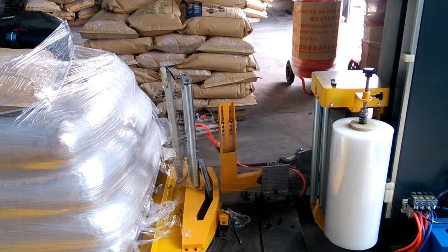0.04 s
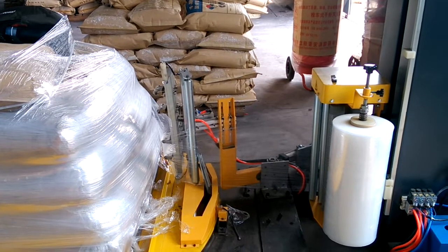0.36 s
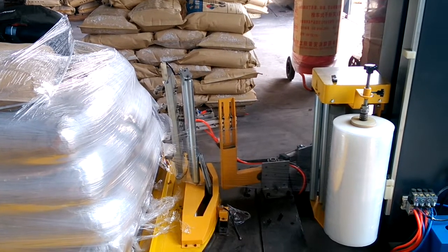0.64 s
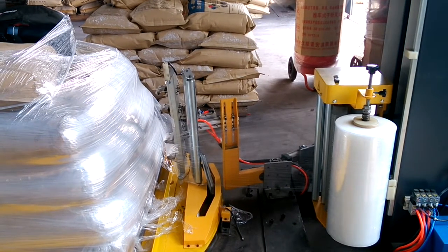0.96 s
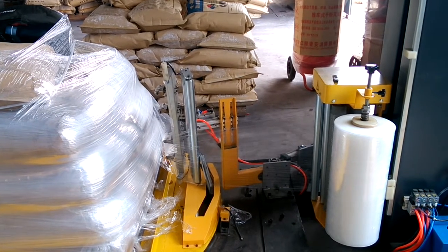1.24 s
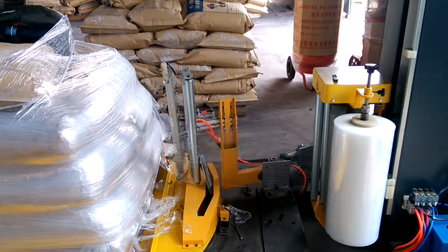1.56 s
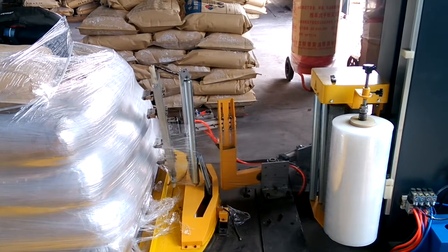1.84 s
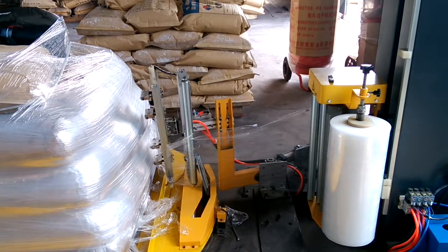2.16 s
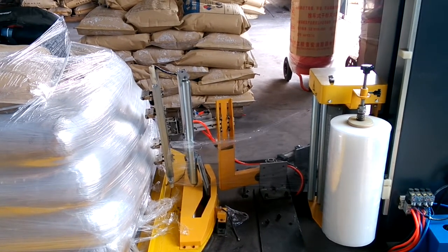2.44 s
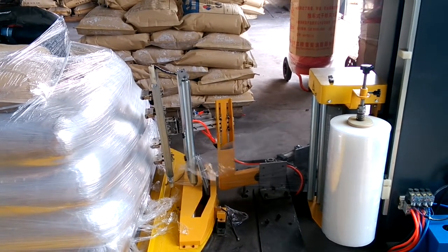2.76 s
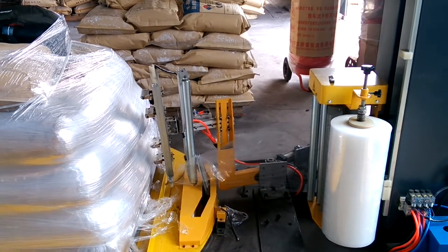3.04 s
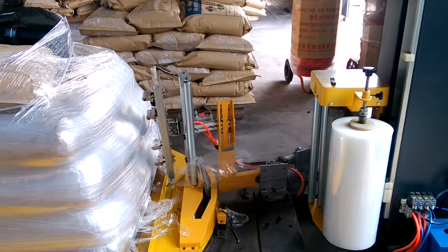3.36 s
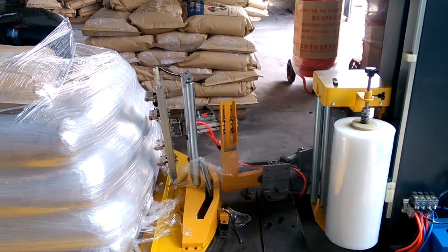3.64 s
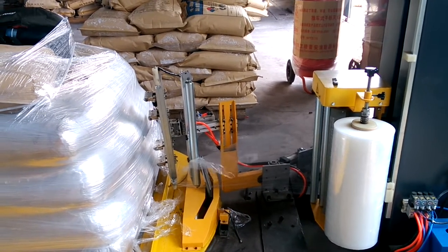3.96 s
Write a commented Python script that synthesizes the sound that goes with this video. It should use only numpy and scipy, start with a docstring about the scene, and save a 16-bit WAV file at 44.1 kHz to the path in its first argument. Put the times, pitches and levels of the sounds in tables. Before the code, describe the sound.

Compressed air puffs, a steel clamp clanks, then air hisses loudly over a low motor hum.

```python
"""A warehouse, where a pallet wrapper ends its cycle over throbbing motors and a faint air leak.
A valve snaps and vents a puff; the steel film clamp swings over, clanks against its stops and shakes
the deck. Then a second valve opens and compressed air hisses loudly and steadily from a nozzle.
The machine leaves a dull echo in the hall, and a noise suppressor ducks the quiet moments."""
import sys
import numpy as np
from scipy import signal
from scipy.fft import rfft, irfft
from scipy.io import wavfile
from scipy.ndimage import uniform_filter1d

SR = 44100
rng = np.random.default_rng(int(sys.argv[2]) if len(sys.argv) > 2 else 0)


def generate_wav(sig):
    """Save sig (samples, or channels by samples) to the path in sys.argv[1] as 16-bit PCM at SR."""
    pcm = np.round(np.clip(np.atleast_2d(sig).T, -1, 1) * 32767).astype(np.int16)
    wavfile.write(sys.argv[1], SR, pcm)


N = 176400
T = np.arange(N) / SR
HZ = np.maximum(np.arange(N // 2 + 1) * SR / N, 1)


# Level ride of the open jet: time_s, level_db
JET_RIDE = [(2.62, -13), (2.69, -11), (2.724, -12), (2.744, -11.5), (2.775, -13), (2.96, -12.5),
            (2.995, -14), (3.045, -13), (3.51, -14), (3.545, -12.5), (3.64, -14.5), (3.77, -14), (3.8, -15),
            (3.9, -13.5), (3.955, -15)]
# Bright hiss of the escaping air: freq_hz, gain_db
HISS_EQ = [(1060, -48), (1800, -19.5), (2160, -17), (2560, -12), (3040, -16), (3490, -13.5), (4170, -15.5),
           (4870, -10.5), (5310, -11), (6100, -6.5), (6690, -6.8), (7230, -2), (8220, -0.5), (9350, -4),
           (11100, -10.5), (14000, -14.5)]
# Low roar of air striking film and frame: freq_hz, gain_db
ROAR_EQ = [(70, -4.5), (130, -8), (190, -5.5), (230, 2), (290, -5), (370, 2.5), (480, -6), (640, -11.5),
           (830, -6.5), (1000, -4), (1350, -3), (1650, -11.5), (2000, -12.5)]
# Nozzle whistles: pitch_hz, width_hz, level_db
NOZZLE_RINGS = [(1412, 40, -15), (2630, 200, -17), (5027, 60, -16), (5600, 50, -15), (7346, 100, -5),
                (8139, 45, -1.5), (8330, 50, 0), (9212, 110, -1), (10440, 100, -12)]

def air_jet(leak_s=2.573, open_s=2.605):
    """The second valve leaks briefly, then opens to a fluttering jet of hiss, whistles and roar."""
    opening = np.clip((T - open_s) / .006, 0, 1)
    leak = from_db(-21.5) * (T > leak_s) * (1 - opening)
    flow = leak + opening * from_db(np.interp(T, *np.transpose(JET_RIDE)) - .5)
    roar = noise(colour(ROAR_EQ) / (1 + (HZ / 2500) ** 4))
    hiss = noise(colour(HISS_EQ))
    whistles = noise(resonances(NOZZLE_RINGS))
    air = hiss + from_db(-6) * whistles + from_db(-16) * roar
    flutter_db = .36 * drift(rate_hz=24.3)
    sputter_db = .3 * drift(rate_hz=250)
    return flow * from_db(flutter_db + sputter_db) * turbulence(hiss_swell(air))


# Level ride of the lower band of the hiss: time_s, gain_db
SWELL_RIDE = [(2.885, .4), (2.91, -1), (3.33, -0.8), (3.49, 2.5), (3.53, -1.5), (3.64, 2), (3.685, 0)]

def hiss_swell(air, centre_hz=5740, width_hz=970):
    """The lower part of the hiss swells and recedes."""
    band = irfft(rfft(air) / (1 + ((HZ - centre_hz) / width_hz) ** 4), N)
    gain = from_db(np.interp(T, *np.transpose(SWELL_RIDE)))
    return air + band * (gain - 1)


def turbulence(air, treble_depth_db=1.8, flutter_hz=24.3, swell_hz=6):
    """Each band of the jet flutters and swells on its own, the treble most."""
    centres_hz = np.array([500, 1500, 3500, 6000, 7500, 8500, 10000, 13000])
    spectrum, out = rfft(air), 0
    for hz, share in zip(centres_hz, np.eye(len(centres_hz))):
        band = irfft(spectrum * np.interp(np.log(HZ), np.log(centres_hz), share), N)
        depth_db = treble_depth_db * min(hz / 8500, 1)
        out = out + band * from_db(depth_db * (drift(flutter_hz) + .3 * drift(swell_hz)))
    return out


# Hits of the valves and clamp: start_s, crack_db, clatter_db, thud_db, clatter_t60_s
HITS = [(1.5811, -8.5, -21.5, -34, 0.13), (1.5996, -12.5, -36, -27, 0.09), (1.7957, -16.5, -21, -27, 0.25),
        (1.865, -23, -24.5, -41, 0.1), (1.871, -22, -26, -31, 0.2), (1.949, -48, -33, -40, .1),
        (1.9589, -45, -24.5, -29, 0.28), (1.9715, -25, -38, -36, .1), (1.995, -36, -28.5, -30.5, 0.2),
        (2.571, -17, -34, -29.5, 0.14), (2.577, -26, -22.5, -47, 0.18)]
# Sharp crack on the front of a hit: freq_hz, gain_db
CRACK_EQ = [(500, -23), (3000, -19), (6000, -8), (8000, 8), (10500, -2.5), (14000, -12)]
# Clatter of the steel arms: freq_hz, gain_db
CLATTER_EQ = [(260, -26), (450, -11), (654, -16.5), (964, 3), (1840, -8), (2290, -3.5), (2920, -8),
              (3140, -2), (4630, -8.5), (6170, -3), (6720, -3.5), (8220, 3), (14000, -22.5)]
# Thud of the frame: freq_hz, gain_db
THUD_EQ = [(75, -25), (110, -1), (200, -6), (330, -2.5), (450, -7.5), (700, -15.5), (1500, -26)]

def valve_and_clamp_hits():
    """Each hit layers a crack, a grainy clatter of steel and a thud of the frame."""
    crack_level = clatter_power = thud_power = 0
    for start_s, crack_db, clatter_db, thud_db, clatter_t60_s in HITS:
        crack_level += from_db(crack_db) * envelope(start_s, .0003, hold_s=.0003, t60_s=.021)
        clatter_power += (from_db(clatter_db) * envelope(start_s, .00065, clatter_t60_s)) ** 2
        thud_power += (from_db(thud_db) * envelope(start_s, .0054, t60_s=.28)) ** 2
    crack = crack_level * noise(colour(CRACK_EQ))
    grain = from_db(.5 * drift(rate_hz=250))
    clatter = np.sqrt(clatter_power) * grain * noise(colour(CLATTER_EQ))
    thud = np.sqrt(thud_power) * noise(colour(THUD_EQ))
    return crack + clatter + thud


# Low resonances of the deck: pitch_hz, width_hz, level_db
DECK_RINGS = [(115, 38, -3), (160, 33, -6.5), (197, 31, -7), (270, 17, -1.5), (347, 37, -3.5)]
LANDING_S = 1.8

def deck_boom(pitch_hz=102.6, shudder_s=1.822):
    """The clamp lands: the deck booms in its lowest mode and shudders."""
    boom = from_db(-23.5) * envelope(LANDING_S, .023, t60_s=.33)
    lowest_mode = np.sin(2 * np.pi * pitch_hz * (T - LANDING_S))
    shudder = from_db(-29.5) * envelope(shudder_s, .0054, hold_s=.085, t60_s=.1)
    return boom * lowest_mode + shudder * noise(resonances(DECK_RINGS))


# Ring of the valve body: pitch_hz, width_hz, level_db
VALVE_RINGS = [(3230, 130, 0)]
PUFF_S = 1.582

def valve_ring():
    """The body of the first valve rings as it opens."""
    return from_db(-30.5) * envelope(PUFF_S, .007, t60_s=.17) * noise(resonances(VALVE_RINGS))


# The arm meets its stops: start_s, level_db
ARM_SNAPS = [(1.7962, -20.5), (1.8645, -23)]
# Bright ring of the arm: pitch_hz, width_hz, level_db
ARM_RINGS = [(3300, 600, -11), (4840, 390, -1), (6200, 350, 2.5)]

def arm_snaps():
    """The steel arm gives a short, bright snap at each stop."""
    level = sum(from_db(db) * envelope(start_s, .00065, hold_s=.0015, t60_s=.042)
                for start_s, db in ARM_SNAPS)
    return level * noise(resonances(ARM_RINGS))


# Airy puff from the exhaust port: freq_hz, gain_db
PUFF_EQ = [(590, -13.5), (1060, -13), (1660, -16.5), (2260, -20.5), (3330, -12), (4900, -11), (5850, -14.5),
           (7380, -7.5), (8240, 2), (9510, -4), (10200, -12.5), (14000, -19.5)]
# Whistles of that port: pitch_hz, width_hz, level_db
PUFF_RINGS = [(5000, 300, -6), (6600, 150, -7), (8200, 220, -3.5)]
# Hollow ring of the cylinder as the pressure hits: pitch_hz, level_db, t60_s
CYLINDER_MODES = [(310, 0, 0.11), (345, -9, 0.5), (290, -13, .4)]
# Soft tail of air seeping after the clamp lands: freq_hz, gain_db
BLEED_EQ = [(200, 9), (900, -9), (2000, -11), (4000, -16), (7000, -15), (14000, -28)]

def cylinder_exhaust():
    """The cylinder rings hollow, dumps air through a whistling port as it travels, then bleeds on."""
    puff = from_db(-20) * envelope(PUFF_S, .013, hold_s=.008, t60_s=.3)
    stroke = from_db(-33) * envelope(PUFF_S, .013, hold_s=.19, t60_s=.78)
    air = noise(colour(PUFF_EQ)) + from_db(-6) * noise(resonances(PUFF_RINGS))
    ring = sum(from_db(db - 20) * envelope(PUFF_S, .002, t60_s) * np.sin(2 * np.pi * hz * (T - PUFF_S))
               for hz, db, t60_s in CYLINDER_MODES)
    bleed = from_db(-45.5) * envelope(LANDING_S, .041, t60_s=9.3) * noise(colour(BLEED_EQ))
    sputter = from_db(.87 * drift(rate_hz=320))
    return (puff + stroke) * sputter * air + ring + bleed


# Hum of the three motors: idle_pitch_hz, loaded_pitch_hz
MOTOR_PITCHES = [(49.2, 49.2), (40.0, 42.4), (44.9, 44.9)]
# Balance of those motors: level_db
MOTOR_LEVELS = [-34, -41, -46]
# Overtones of the hum: pitch_hz, level_db
HUM_OVERTONES = [(98.4, -49.5), (147.6, -52.5), (246.2, -54), (501.5, -58.5)]

def motor_hum(in_phase_s=.9, load_s=1.89, rise_db_per_s=1.5):
    """Motors at slightly different speeds beat in a growing hum; the throb slows under load."""
    hum = 0
    for (idle_hz, loaded_hz), db in zip(MOTOR_PITCHES, MOTOR_LEVELS):
        level = from_db(db + rise_db_per_s * (T - in_phase_s) + 1.3 * drift(rate_hz=.84))
        cycles = idle_hz * (T - in_phase_s) + (loaded_hz - idle_hz) * np.maximum(T - load_s, 0)
        hum += level * np.cos(2 * np.pi * cycles)
    for hz, db in HUM_OVERTONES:
        level = from_db(db + 3.2 * drift(rate_hz=4))
        phase_wobble = .0027 * hz * drift(rate_hz=3.9)
        hum += level * np.cos(2 * np.pi * hz * T + phase_wobble)
    return np.sqrt(2) * hum  # the levels are rms


# Bed of hall rumble and faint leak: freq_hz, gain_db
ROOM_TONE_EQ = [(30, 8), (70, -6), (130, -5), (220, -5), (450, -14), (1100, -23), (2600, -33),
                (6000, -34.5), (7100, -26.5), (8450, -20), (9400, -27), (11500, -29), (12500, -35)]

def room_tone():
    """The hall rumbles steadily under the thin hiss of an air leak."""
    return from_db(-42.5) * noise(colour(ROOM_TONE_EQ))


# Dark tone of the hall's echo: freq_hz, gain_db
ECHO_EQ = [(100, 16), (1000, -3), (3000, -2), (8000, -17), (14000, -35)]

def warehouse_echo(sound):
    """The hall returns a faint, dull tail."""
    tail = noise(colour(ECHO_EQ)) * envelope(.014, .036, t60_s=.9)
    impulse = rms_one(tail) / np.sqrt(N)
    return from_db(-26) * signal.fftconvolve(sound.mean(axis=0)[None], impulse, axes=1)[:, :N]


# Stereo spread of every noise layer: freq_hz, side_gain_db
SIDE_EQ = [(4400, -47), (5200, -18), (6000, -10.5), (7600, -7.5), (8300, -9), (9200, -7.5), (11500, -4),
           (14000, -6.5)]

def noise(gain):
    """Stereo noise of a given colour, wide only in the treble; its centre has rms 1."""
    mid_spectrum, side_spectrum = rfft(rng.standard_normal((2, N))) * gain
    mid = irfft(mid_spectrum, N)
    side = irfft(side_spectrum * colour(SIDE_EQ), N)
    return (mid + side * np.array([[1], [-1]])) / mid.std()


def colour(points):
    """EQ curve through the points, falling steeply below the first."""
    hz, db = np.transpose(points)
    return from_db(np.interp(np.log(HZ), np.log(hz), db)) * np.minimum(HZ / hz[0], 1) ** 2


def resonances(rows):
    """EQ curve of resonant peaks, each carrying the power of its row."""
    return np.sqrt(sum(from_db(db) ** 2 / width / (1 + ((HZ - hz) / width) ** 2) ** 2
                       for hz, width, db in rows))


def envelope(start_s, attack_s, t60_s, hold_s=0):
    """Straight rise, hold, exponential release."""
    age = T - start_s
    release_db = -60 * np.clip((age - attack_s - hold_s) / t60_s, 0, 4)
    return np.clip(age / attack_s, 0, 1) * from_db(release_db)


def drift(rate_hz):
    """Smooth random modulation with rms 1."""
    return rms_one(irfft(rfft(rng.standard_normal(N)) / (1 + (HZ / rate_hz) ** 2), N))


def from_db(db):
    return 10 ** (np.asarray(db) / 20)


def rms_one(x):
    return x / np.sqrt(np.mean(x ** 2) + 1e-20)


def scene():
    """The wrapper's hits and air, with their echo, over the motors and room tone."""
    hits = valve_and_clamp_hits() + deck_boom() + valve_ring() + arm_snaps()
    machine = hits + cylinder_exhaust() + air_jet()
    return machine + warehouse_echo(machine) + motor_hum() + room_tone()


def record(dry, threshold_db=-29, window_s=.021, bass_hz=90, mono_below_hz=4500, cutoff_hz=14280):
    """A suppressor ducks quiet moments; peaks clip, lows and mids fold to mono, the top is cut."""
    power = uniform_filter1d(dry.mean(axis=0) ** 2, int(window_s * SR))
    level_db = 10 * np.log10(np.abs(power) + 1e-12)
    duck = from_db(.6 * np.clip(level_db - threshold_db, -12, 0))  # the faint hiss pumps with the hum
    bass = irfft(rfft(dry) / (1 + (HZ / bass_hz) ** 4), N)
    left, right = np.clip(bass + duck * (dry - bass), -.88, .88)
    side = irfft(rfft(left - right) / (1 + (mono_below_hz / HZ) ** 20), N)
    stereo = (left + right + side * np.array([[1], [-1]])) / 2
    lowpass = signal.firwin(801, cutoff_hz, fs=SR)
    return signal.fftconvolve(stereo, lowpass[None], "same", axes=1)


dry = scene()
out = record(dry)
generate_wav(out)
```